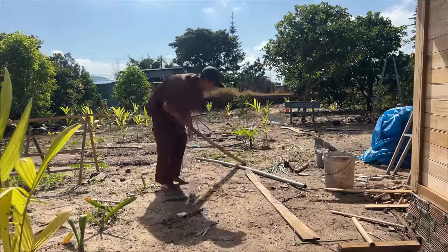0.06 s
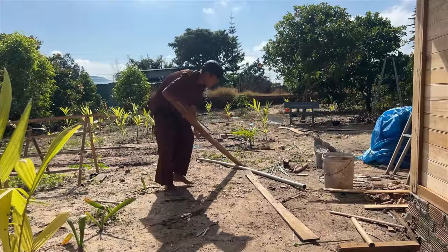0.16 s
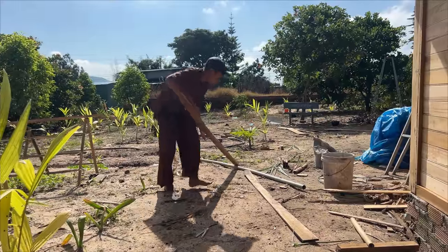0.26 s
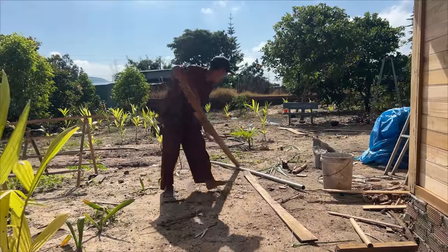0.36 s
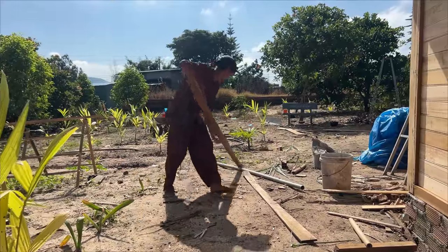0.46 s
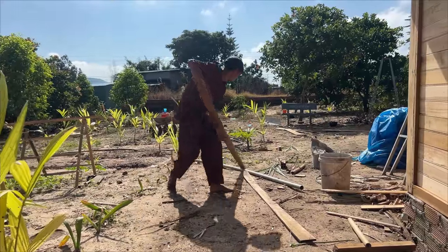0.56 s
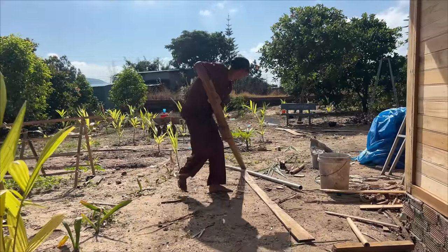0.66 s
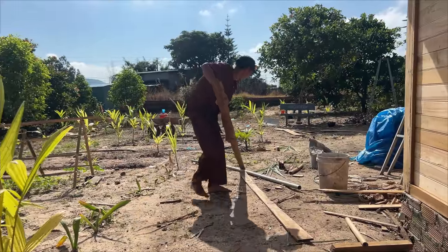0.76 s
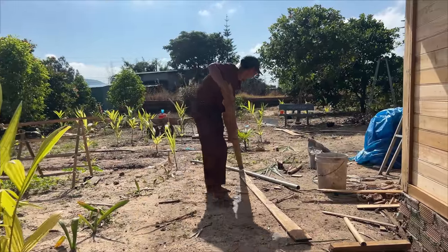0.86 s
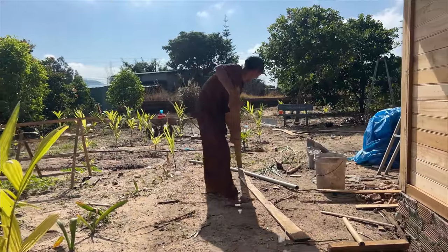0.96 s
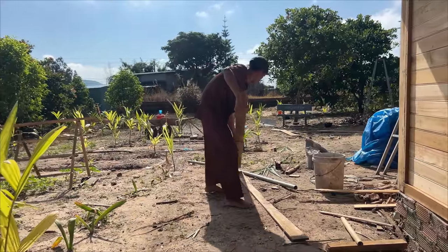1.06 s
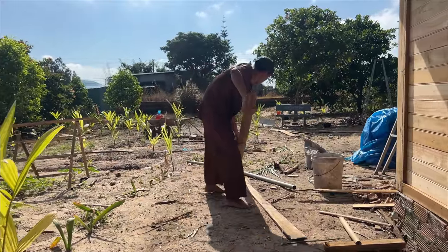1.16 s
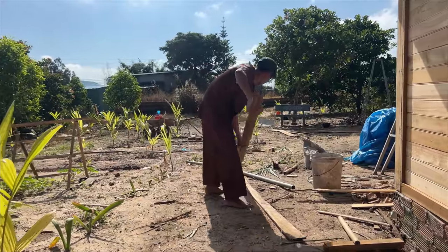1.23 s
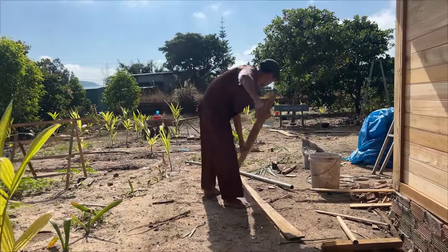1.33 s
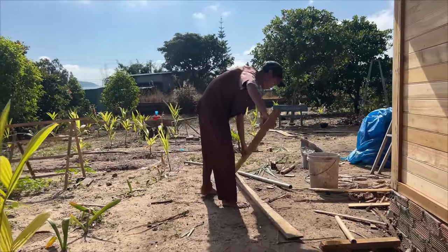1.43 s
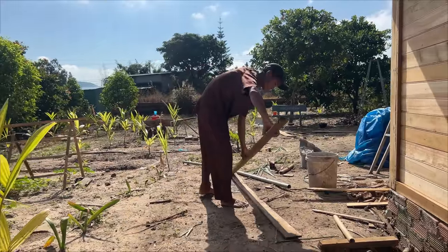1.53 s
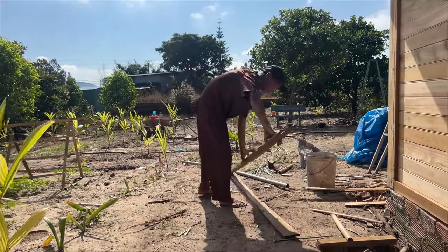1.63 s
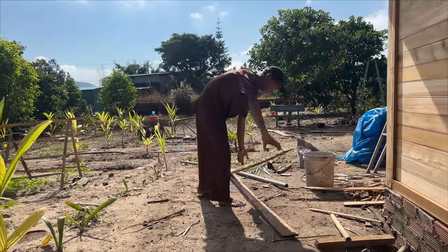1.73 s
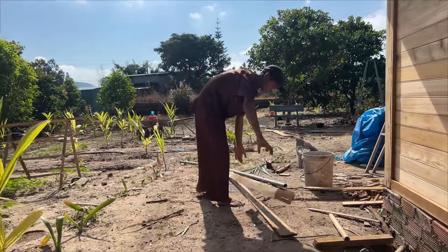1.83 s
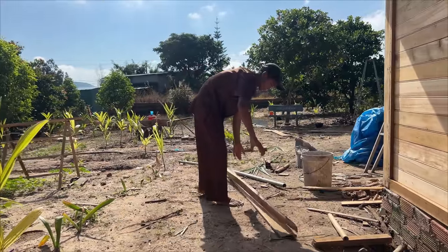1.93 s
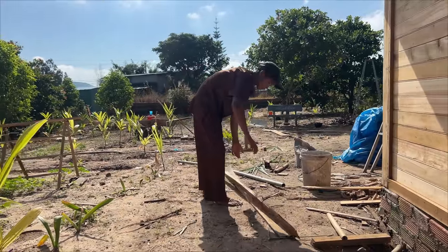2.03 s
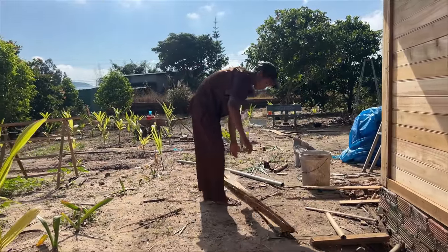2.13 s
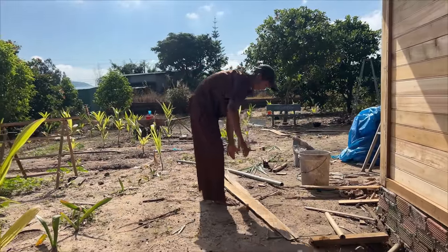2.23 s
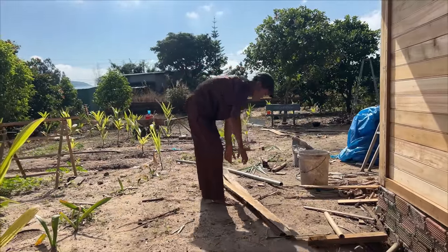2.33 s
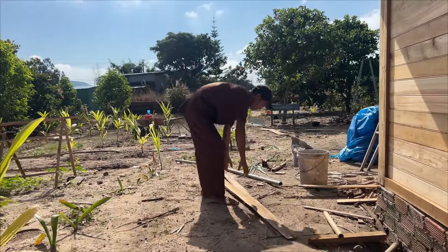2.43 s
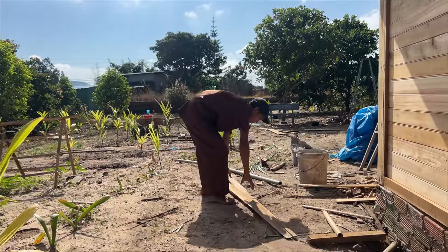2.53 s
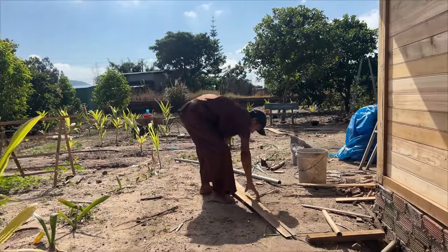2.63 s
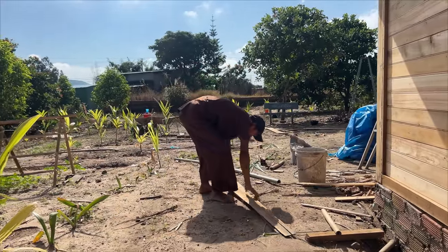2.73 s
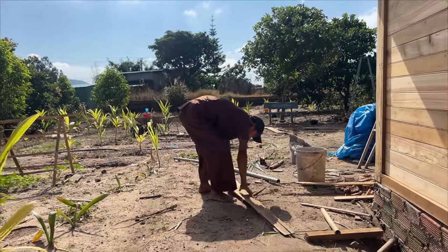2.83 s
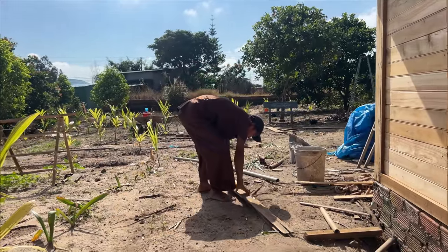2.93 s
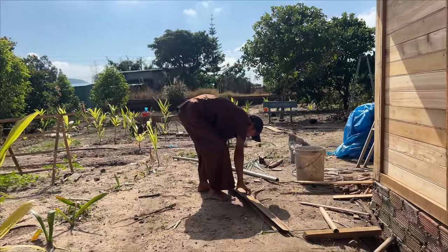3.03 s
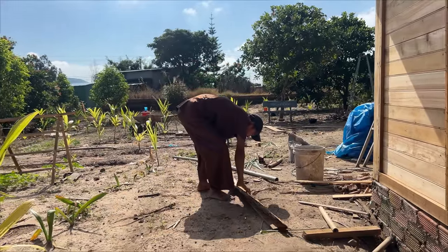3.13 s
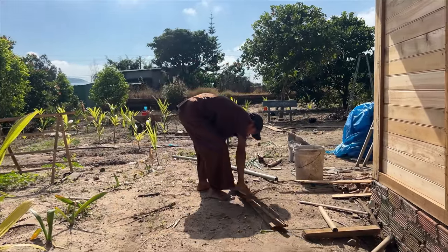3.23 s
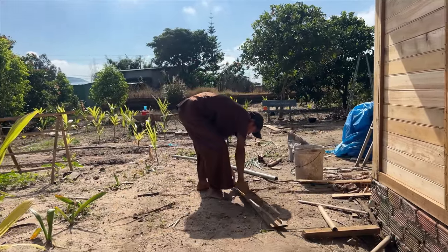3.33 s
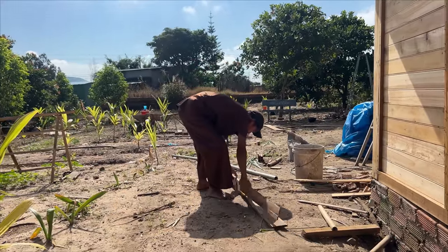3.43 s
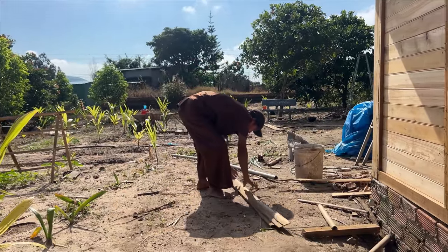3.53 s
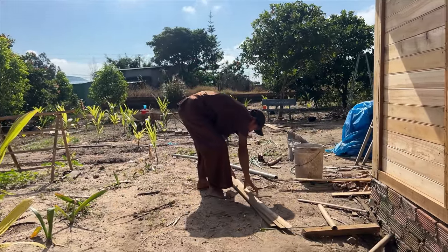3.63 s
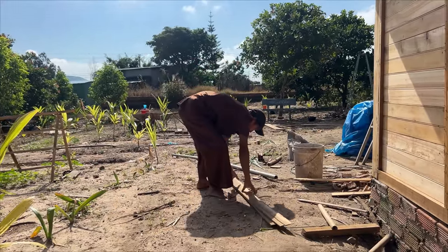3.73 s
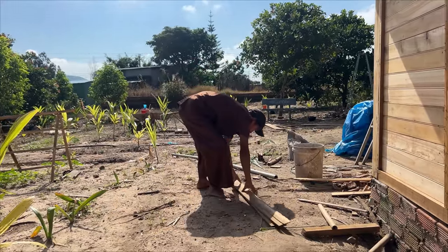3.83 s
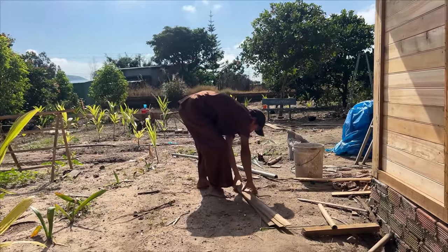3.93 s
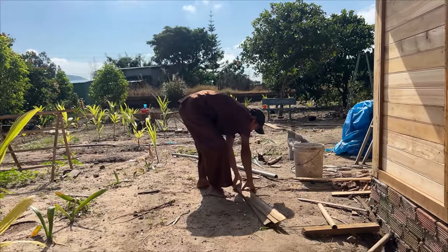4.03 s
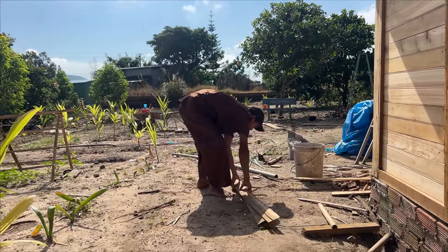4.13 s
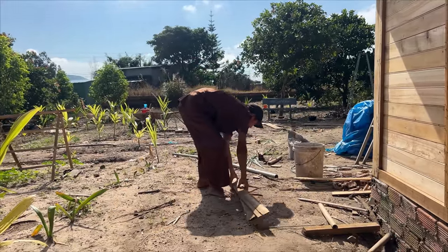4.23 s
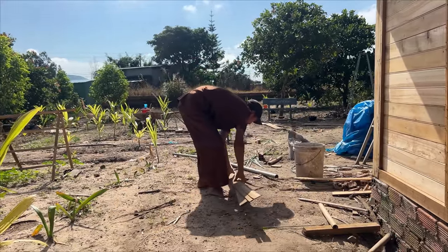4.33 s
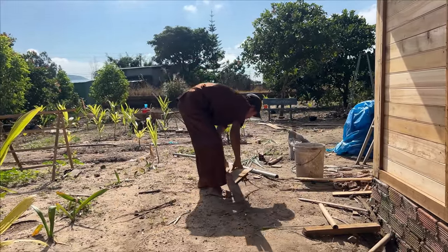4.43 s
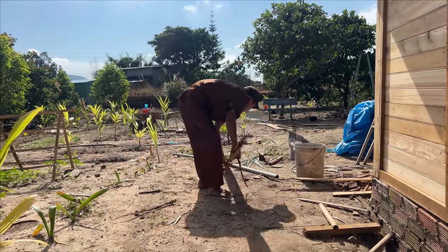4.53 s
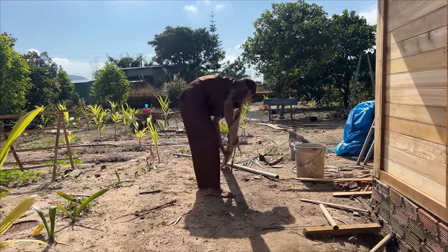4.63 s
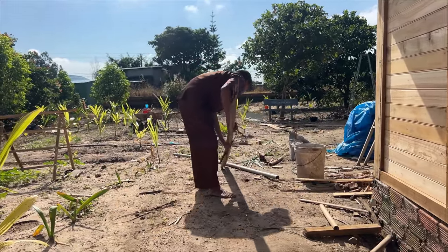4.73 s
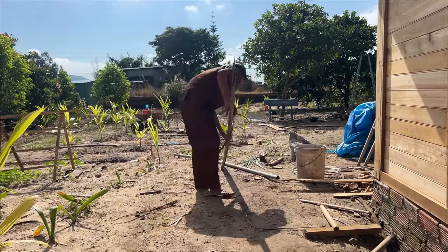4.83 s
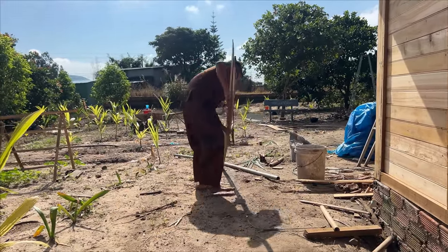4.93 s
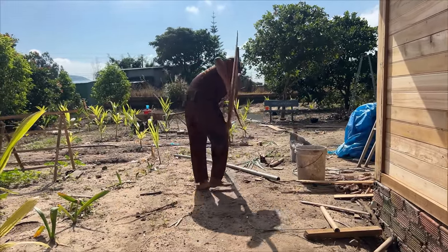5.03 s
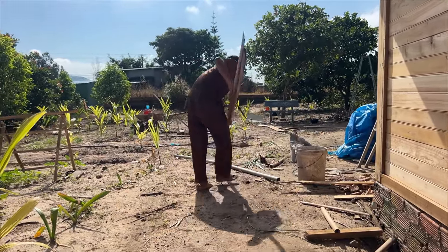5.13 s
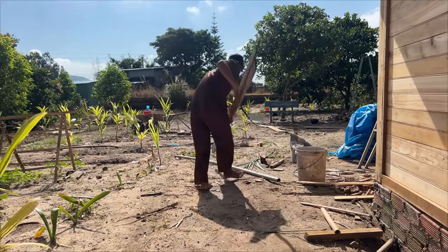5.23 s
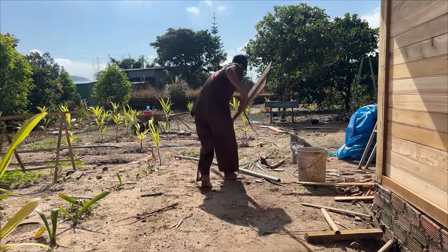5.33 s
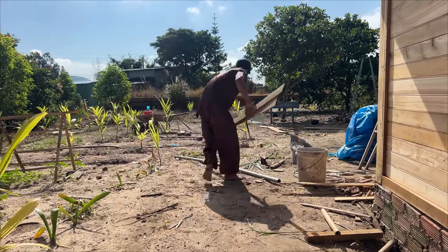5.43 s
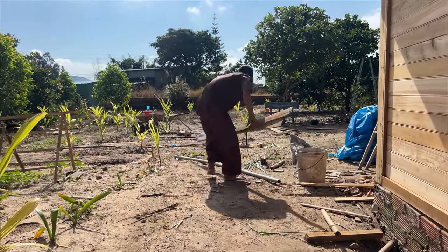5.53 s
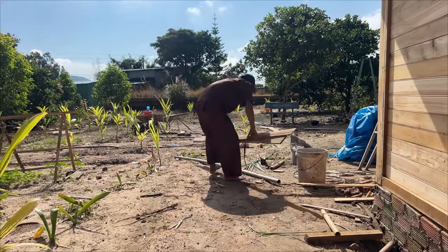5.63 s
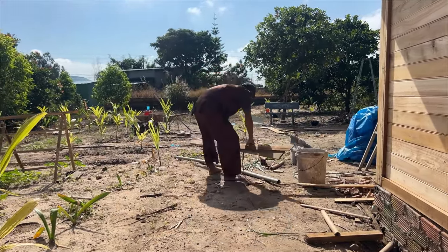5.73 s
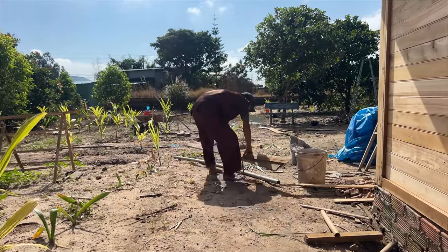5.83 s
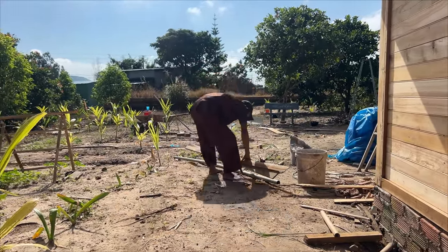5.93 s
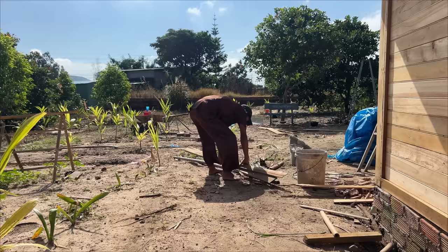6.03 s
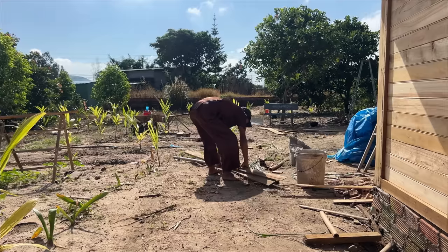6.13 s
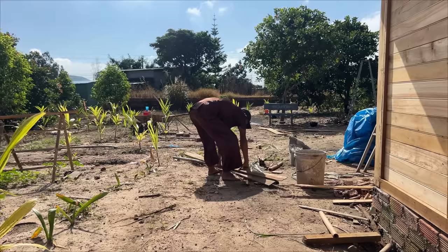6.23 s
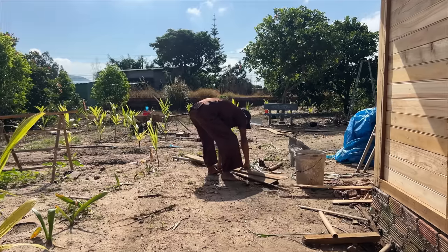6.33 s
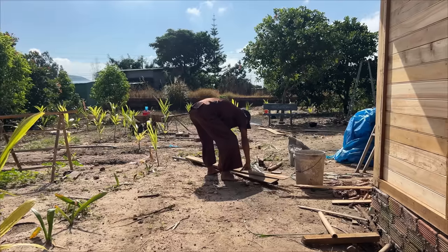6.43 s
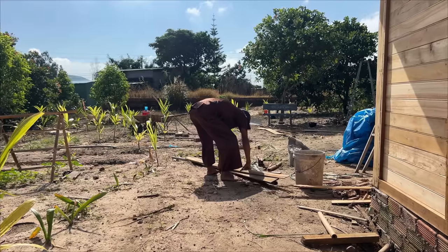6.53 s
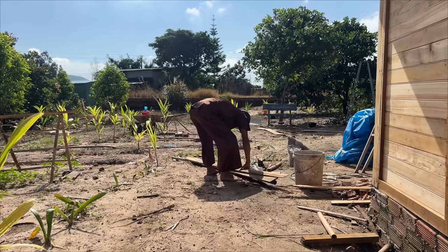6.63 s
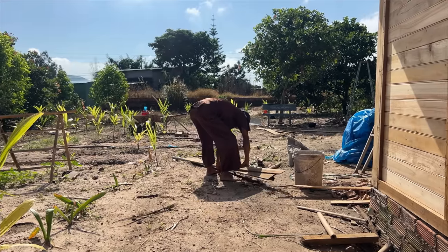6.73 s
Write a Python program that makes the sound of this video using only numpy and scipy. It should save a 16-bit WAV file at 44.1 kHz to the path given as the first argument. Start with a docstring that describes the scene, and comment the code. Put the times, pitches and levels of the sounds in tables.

```python
"""Boards and poles handled in a yard

Wooden boards and poles are dragged, dropped and gathered on dry soil, a few metres away.
Knocks ring board modes, crack and thud, with weak echoes and a short tail; wood and soles scuff grit as clumpy noise.
A pole sings as noise through resonances. Far engine orders, rumble and a hum lie behind, with still air and
faint chirps and narrow noise bands, made of randomly modulated sines."""
import sys
import numpy as np
from scipy import signal
from scipy.fft import rfft, irfft, next_fast_len
from scipy.io import wavfile
from scipy.ndimage import uniform_filter1d, map_coordinates

SR = 44100
rng = np.random.default_rng(int(sys.argv[2]) if len(sys.argv) > 2 else 0)


def file_out(sig):
    """Save sig as 16-bit WAV at sys.argv[1]."""
    # one column per channel
    cols = np.atleast_2d(sig).T
    # limit, then scale
    lim = np.clip(cols, -1, 1)
    pcm = np.round(lim * 32767).astype(np.int16)
    wavfile.write(sys.argv[1], SR, pcm)


N = 298137

# Far traffic and engine. Each row: time in seconds, rumble level in dB, engine level in dB.
FAR_LEVELS = [(0, -49.5, -54.5), (.5, -47, -51), (.8, -48, -61.5), (1.4, -51, -54), (2, -49.5, -67.5),
              (2.4, -45.5, -59.5), (2.9, -50, -61.5), (3.6, -49, -64), (4.5, -52.5, -90),
              (5.6, -50.5, -67.5), (6.5, -52.5, -63), (6.76, -42.5, -81)]
# Rumble spectrum. Each row: frequency in Hz, density in dB per Hz.
RUMBLE_SPECTRUM = [(20, -31), (39, -7), (59, 3.5), (130, -1), (165, -9.5), (220, -14.5), (300, -14),
                   (500, -49.5), (900, -71.5)]
# Engine orders. Each row: mean frequency in Hz, mean level in dB under the engine curve.
ENGINE_ORDERS = [(66, -6), (165, 1.5), (198, -1.1)]
HUM_HZ, HUM_DB = 250, -68
# Still yard, leaves and insects. Each row: frequency in Hz, density in dB per Hz.
AIR_SPECTRUM = [(180, -39), (300, -8), (432, -6), (1850, -13), (3100, -19), (6210, -14), (9400, -39),
                (15700, -49.5)]
AIR_RMS_DB = -68
# Faint chirps and narrow bands of noise, birds or insects.
# Each row: start in seconds, end in seconds, start, middle and end pitch in Hz, level in dB.
CHIRPS = [(.8, .95, 4700, 4750, 4700, -75), (1.05, 1.2, 5000, 5100, 5300, -76),
          (2.82, 3.3, 5150, 5050, 5200, -74), (4.98, 5.1, 4500, 4500, 4550, -76),
          (5.10, 5.15, 5500, 5150, 4900, -75), (5.165, 5.22, 5000, 5030, 5200, -72),
          (5.505, 5.54, 4750, 4650, 4600, -58), (6.285, 6.35, 5050, 5120, 5300, -69)]
# Pole resonances. Each row: frequency in Hz, width in Hz, relative level in dB.
POLE_RESONANCES = [(1180, 120, -4), (1350, 130, -1), (1520, 130, -1), (2010, 45, 3), (2550, 90, -10),
                   (3700, 400, -17)]
# Pull on the pole. Each row: time in seconds, level in dB.
POLE_PULL = [(0, -67.5), (.15, -59.5), (.22, -46), (.29, -56.5), (.4, -50), (.55, -45.5), (.6, -48.5),
             (.655, -48), (.7, -76), (1.1, -76)]
# Strokes over the soil. Each row: start in seconds, length in seconds, dragged wood in dB, loose grit in dB.
STROKES = [(0, 0.115, -57, -62), (0.18, 0.08, -56.5, -56), (0.284, 0.38, -54.5, -59),
           (0.68, 0.417, -60.5, -96), (1.277, 0.1, -49, -63.5), (1.57, 0.15, -66.5, -72),
           (1.93, 0.083, -33, -48), (2.071, 0.14, -34.5, -60), (2.266, 0.068, -31.5, -61.5),
           (2.413, 0.05, -42.5, -68.5), (2.767, 0.11, -55, -64), (3.182, 0.024, -58.5, -95),
           (3.5, 0.039, -54.5, -70.5), (3.552, 0.088, -46.5, -68), (3.675, 0.088, -54.5, -80),
           (3.935, 0.12, -54.5, -76.5), (4.276, 0.069, -54, -66.5), (4.592, 0.104, -66, -71.5),
           (4.743, 0.266, -57, -62.5), (5.291, 0.19, -68, -64), (5.383, 0.039, -58.5, -57.5),
           (5.53, 0.26, -63, -67.5), (5.748, 0.071, -55, -56.5), (5.851, 0.058, -55, -60),
           (5.992, 0.031, -52, -54.5), (6.062, 0.33, -64.5, -65.5), (6.67, 0.035, -56.5, -70.5),
           (6.714, 0.1, -47, -52.5)]
RISE_DB_PER_S, FALL_DB_PER_S = 595.5, 339  # into a stroke; after it, on top of the sag
DRAG_SAG_DB_PER_S = 17.5  # along a stroke
GRIT_SAG_DB_PER_S = 0.93 * DRAG_SAG_DB_PER_S
DRAG_REST_DB, GRIT_REST_DB = -72.5, -80  # between strokes
# Dragged wood spectrum. Each row: frequency in Hz, density in dB per Hz.
DRAG_SPECTRUM = [(250, -46), (400, 2.5), (900, -1.5), (1350, -0.5), (1750, -2), (2000, -3), (2400, -3.5),
                 (4000, -10.5), (6000, -46.5)]
# Loose grit spectrum. Each row: frequency in Hz, density in dB per Hz.
GRIT_SPECTRUM = [(1500, -33), (2800, -6), (4000, -2.5), (8300, -3), (9600, -7.5), (10500, -31.5),
                 (15700, -23)]
# Knocks and rebounds. Each row: start in seconds, ring peak in dB, ring centre in Hz,
# resonance width over that centre (ratio), crack in dB relative to the ring peak.
KNOCKS = [(0.171, -38, 1990, 0.95, 4.5), (0.21, -30, 2060, 2.1, -5), (0.232, -32, 2250, 0.58, -6),
          (0.257, -39.5, 1150, 0.72, -10), (0.312, -43, 2110, .5, 0), (0.643, -39, 2980, 0.42, -5),
          (1.018, -67.5, 3500, .5, 17.5), (1.2646, -22.5, 970, 1.5, -17.5), (1.272, -32.5, 1900, 2.6, -7),
          (1.2957, -30, 860, 1.35, -16), (1.924, -3, 1640, 1.9, -4.5), (1.931, -11, 1260, 2.1, -5),
          (1.946, -10.5, 1490, 3, -13), (1.96, -8.5, 2000, 1.7, -12), (2.066, -23, 1470, 1.3, -21.5),
          (2.074, -17.5, 1700, 0.5, -30), (2.121, -21.5, 1260, 0.94, -35.5), (2.129, -19, 1270, 1.8, -15.5),
          (2.159, -20, 980, 1.6, -16), (2.181, -16.5, 1610, 1.3, -21), (2.209, -27, 1690, 0.97, -18),
          (2.235, -19, 1730, 2.7, -11), (2.2626, -12, 2350, 0.75, -1), (2.272, -13.5, 1880, 1.3, -8.5),
          (2.302, -14, 1740, 0.69, -10), (2.32, -26, 1680, 0.45, -28), (2.343, -26.5, 1730, 0.77, -36),
          (2.371, -29, 1890, 1.4, -13), (2.386, -28, 2110, 1.3, -13.5), (2.398, -29, 1430, 0.68, -18),
          (2.432, -25, 1440, 1.6, -12.5), (2.444, -28.5, 1560, 3.3, -12), (2.535, -34, 1520, 0.73, -20),
          (2.752, -40.5, 1980, 0.34, -1.5), (3.533, -33, 486, 1.04, -13), (3.57, -12, 1690, 1.5, -46),
          (3.575, -20.5, 1300, 2.1, -16), (3.598, -21.5, 1490, 1, -13.5), (3.613, -22.5, 485, 0.83, -46),
          (3.627, -29, 1510, .4, -43.5), (3.635, -27, 635, 1.05, -38), (3.654, -27, 670, 0.5, -44),
          (3.675, -20.5, 2830, 1.3, -4.5), (3.682, -22, 1730, 2.7, -8.5), (3.938, -39, 2410, 0.57, -8.5),
          (3.945, -36, 1400, 0.48, -24), (4.033, -39, 1520, 1.1, -5), (4.045, -30.5, 2270, 0.29, -8.5),
          (4.214, -40, 1660, 0.94, -38), (4.266, -35.5, 1760, 1.5, -10), (4.298, -41, 1260, 0.52, -21),
          (4.764, -49.5, 735, 0.24, -2), (4.879, -39.5, 2130, 0.68, 0.5), (5.404, -52, 980, 0.43, -2),
          (5.51, -51.5, 1277, 0.63, 8), (5.772, -49, 1600, 1.6, -5), (5.975, -54, 1220, 0.41, -7),
          (6.004, -42.5, 590, 0.4, -12), (6.056, -47.5, 1195, 0.61, -11), (6.148, -53.5, 1680, 0.68, -22),
          (6.539, -48.5, 1090, 1.2, -27), (6.619, -53.5, 903, .5, -20), (6.66, -45.5, 760, 0.82, -17.5),
          (6.696, -42.5, 1100, 0.51, -18.5), (6.722, -36, 520, 1.5, -15.5), (6.753, -34.5, 1700, 0.89, 2.5)]
# Board modes. Each row: mean frequency in Hz, mean level in dB, t60 in seconds.
BOARD_MODES = [(510, -10, .035), (670, -4, .04), (790, -4, .04), (1020, -5, .03), (1195, -4, .045),
               (1330, -4, .035), (1481, -6, .035), (1600, -2, .045), (1880, -1, .04), (2170, -2, .028),
               (2416, -7, .02), (2595, -7.5, .025), (2910, -6, .022)]
# Crack spectrum. Each row: frequency in Hz, density in dB per Hz.
CRACK_SPECTRUM = [(1500, -31.5), (2500, -1.5), (4000, -1.5), (6000, -9.5), (9500, -19), (11000, -37.5),
                  (15700, -37)]
BEND_LAG_S = 0.00203  # bending waves: delay at f Hz is this times 1000 / (200 + f) - 1/4
THUD_DB, THUD_DB_PER_DB = -22, 0.83  # thud gain at a 0 dB knock; growth per dB of knock
# Ground and wall echoes. Each row: mean delay in seconds, mean level in dB.
ECHOES = [(.008, -11), (.014, -12), (.021, -14)]
# Yard tail decay. Each row: frequency in Hz, t60 in seconds.
YARD_T60 = [(200, .3), (1500, .2), (8000, .17)]
# Stereo likeness of the noises. Each row: frequency in Hz, left-right correlation (ratio).
LIKENESS = [(60, 1), (150, 0.92), (300, 0.863), (700, 0.069), (3000, 0.023)]
# The body shades the left port. Each row: frequency in Hz, left over right in dB.
LEFT_OVER_RIGHT = [(130, 1), (640, -1), (3100, -1.5), (6800, -10.5), (10000, 1.5)]
TOP_HZ = 15800


def amp(db):
    """Gain of a level in dB."""
    return 10 ** (np.asarray(db) / 20)


def unit(x):
    """x at rms 1."""
    return x / np.sqrt(np.mean(x ** 2) + 1e-20)


def along(points, hz):
    """Interpolate (Hz, value) points on a log frequency axis."""
    f, value = np.transpose(points)
    return np.interp(np.log(hz + 1), np.log(f + 1), value)


def curves(rows):
    """One value per sample for each column after the time."""
    time_s, *columns = np.transpose(rows)
    return [np.interp(np.arange(N) / SR, time_s, column) for column in columns]


def wobble(rate_hz):
    """A smooth random curve with rate_hz knots a second."""
    knots = rng.standard_normal(int(N * rate_hz / SR) + 4)
    return map_coordinates(knots, [np.arange(N) * rate_hz / SR])


def filtered(x, response):
    """x times a complex response of frequency in Hz."""
    size = next_fast_len(x.shape[-1] + 4096)
    spectrum = rfft(x, size) * response(np.fft.rfftfreq(size, 1 / SR))
    return irfft(spectrum, size)[..., :x.shape[-1]]


def resonance(f, hz, width_hz):
    """A causal resonance of peak gain 1."""
    return 1j * f * width_hz / (hz * hz - f * f + 1j * f * width_hz + 1e-9)


def rush(pair, spectrum, patchy_db=0):
    """Two unrelated noises, patchy in time and frequency, coloured and mixed to a stereo pair of rms 1."""
    z = signal.stft(pair, nperseg=512)[2]
    field = uniform_filter1d(rng.standard_normal(z.shape[1:]), 10, 0)
    field = uniform_filter1d(field, 10, 1)
    pair = signal.istft(z * amp(patchy_db * unit(field)), nperseg=512)[1][:, :N]

    def mid_side(hz):
        turn = np.arccos(np.clip(along(LIKENESS, hz), -1, 1)) / 2  # sets the correlation
        return amp(along(spectrum, hz)) * [np.cos(turn), np.sin(turn)]

    mid, side = filtered(pair, mid_side)
    return unit(np.array([mid + side, mid - side]))


def distance():
    """Low rumble as noise, wavering orders of a far engine as sines, and a thin hum."""
    rumble_db, engine_db = curves(FAR_LEVELS)
    t = np.arange(N) / SR
    turned_s = np.cumsum(1 + 0.025 * wobble(3.2)) / SR  # time at the wavering engine speed
    engine = 0
    for hz, db in ENGINE_ORDERS:
        engine = engine + amp(db + 4 * wobble(4.5)) * np.sin(2 * np.pi * (hz * turned_s + rng.random()))
    hum = amp(HUM_DB + 0.63 * wobble(16.0)) * np.sin(2 * np.pi * HUM_HZ * t)
    noise = rush(rng.standard_normal((2, N)), RUMBLE_SPECTRUM)
    rumble = amp(rumble_db + 2.6 * wobble(7.6)) * noise
    return rumble + amp(engine_db) * engine + hum


def still_air():
    """Leaves and insects as steady, patchy noise."""
    return amp(AIR_RMS_DB) * rush(rng.standard_normal((2, N)), AIR_SPECTRUM, patchy_db=2.5)


def chirps():
    """Faint high chirps and narrow noise bands: gliding or nearly steady sines, randomly modulated."""
    out = np.zeros(N)
    roughness = np.array([wobble(250), wobble(250)]) * amp(2.5 * wobble(40))  # widens the sines
    for start_s, end_s, start_hz, middle_hz, end_hz, db in CHIRPS:
        u = np.linspace(0, 1, round((end_s - start_s) * SR))
        pitch_hz = np.interp(u, [0, .5, 1], [start_hz, middle_hz, end_hz])
        sine = np.sin(2 * np.pi * np.cumsum(pitch_hz) / SR)
        swell = np.sqrt(2 * np.sin(np.pi * u).clip(0))
        out[round(start_s * SR):][:len(u)] += amp(db) * swell * sine
    return out * roughness


def pole():
    """A thin pole pulled over the soil sings roughly; each resonance comes and goes as the grip shifts."""
    rub = rng.standard_normal((2, N)) * amp(3 * wobble(120) + 1.2 * wobble(30))
    ring = np.zeros((2, N))
    for hz, width_hz, db in POLE_RESONANCES:
        ring += amp(db + 2 * wobble(14)) * filtered(rub, lambda f: resonance(f, hz, width_hz))
    pull_db = curves(POLE_PULL)[0]
    return amp(pull_db) * unit(ring + 0.2 * ring[::-1])  # some of each side in the other


def strokes(column, sag_db_per_s, rest_db):
    """Gain of one layer: every stroke rises fast, sags while it lasts and falls away."""
    t = np.arange(0, N, 32) / SR
    power = amp(2 * rest_db)
    for row in STROKES:
        u = t - row[0]
        rise_and_sag_db = np.minimum(RISE_DB_PER_S * u, -sag_db_per_s * u)
        fall_db = FALL_DB_PER_S * np.clip(u - row[1], 0, None)
        power = power + amp(2 * (row[column] + rise_and_sag_db - fall_db))
    return np.interp(np.arange(N) / SR, t, np.sqrt(power))


def grains(rough_db, rate_hz):
    """Noise in clumps of grains, shaped by a random level."""
    return rng.standard_normal((2, N)) * amp(rough_db * wobble(rate_hz))


def scuff():
    """Wood and soles rub dry soil: clumpy noise, the wood part coloured by the board modes."""
    drag = amp(2.5 * wobble(25)) * rush(grains(2.5, 150), DRAG_SPECTRUM, patchy_db=1.7)

    def board_sings(f):
        return 2.2 + sum(np.abs(resonance(f, hz, 60)) ** 2 for hz, *_ in BOARD_MODES)

    drag = unit(filtered(drag, board_sings))
    grit = amp(2.2 * wobble(20)) * rush(grains(3, 300), GRIT_SPECTRUM, patchy_db=1.7)
    drag = drag * strokes(2, DRAG_SAG_DB_PER_S, DRAG_REST_DB)
    grit = grit * strokes(3, GRIT_SAG_DB_PER_S, GRIT_REST_DB)
    return drag + grit


def yard(blow, wet_db):
    """One knock at both ports: direct sound, a few echoes and a short scattered tail."""
    n = len(blow)
    hz, t, z = signal.stft(rng.standard_normal((2, n)), SR, nperseg=256)
    decay = amp(-60 * t / along(YARD_T60, hz)[:, None])
    tail = signal.istft(z * decay, SR, nperseg=256)[1][:, :n]
    onset = np.clip(np.arange(n) / SR / 0.0009, 0, 1)
    path = amp(wet_db) * tail / np.linalg.norm(tail[0]) * onset
    walls = np.zeros((2, n))
    for delay_s, db in ECHOES:
        arrival = round(delay_s * SR) + rng.integers(-16, 17, size=2)
        walls[[0, 1], arrival] += amp(db + rng.normal(0, 1.5, size=2))
    path += filtered(walls, lambda f: 1 / (1 + 1j * f / 4000))  # walls return little treble
    path[:, 0] += 1  # direct sound
    return signal.fftconvolve(blow[None], path, axes=1)[:, :n]


def board_ring(t, centre_hz, spread):
    """Decaying sine modes struck by a chattering contact, loudest around a centre, at peak 1."""
    short = t[:SR // 12]  # the modes are dead by then
    hz, level_db, t60_s = np.transpose(BOARD_MODES)[:, :, None]
    gain = amp(level_db + rng.normal(0, 2.5, hz.shape))
    bent_hz = hz * (1 + rng.normal(0, 0.015, hz.shape))  # boards differ a little
    modes = np.sum(gain * amp(-60 * short / t60_s) * np.sin(2 * np.pi * bent_hz * short), axis=0)
    touches = rng.standard_normal(len(t)) * (rng.random(len(t)) < .03)
    chatter = amp(-11 - 60 * t / .02) * touches
    chatter[0] = 1  # the first contact, then smaller ones along the board
    ring = signal.fftconvolve(modes, chatter)[:len(t)]
    ring = filtered(ring, lambda f: resonance(f, centre_hz, spread * centre_hz) ** 2)
    ring *= (1 - np.exp(-t / 0.001)) ** 2  # the soft face of the wood rounds the attack

    def bending(f):
        return np.exp(-2j * np.pi * BEND_LAG_S * (1000 * np.log(1 + f / 200) - f / 4))

    ring = filtered(ring, bending)
    return ring / np.abs(ring).max()


def wood_crack(t):
    """A short burst of coloured noise, at rms 1 before its envelope."""
    crack = unit(filtered(rng.standard_normal(len(t)), lambda f: amp(along(CRACK_SPECTRUM, f))))
    return crack * (1 - np.exp(-t / 0.0038)) * amp(-60 * t / 0.041)


def soil_thud(t):
    """Thud on the soil: three low sines under one quick rise and decay."""
    push = amp(-60 * t / 0.092) * (1 - np.exp(-t / 0.0037))
    low = np.sin(2 * np.pi * 105 * t) + 0.85 * np.sin(2 * np.pi * 250 * t)
    return push * (low + 0.9 * np.sin(2 * np.pi * rng.uniform(320, 480) * t))


def knocks():
    """Each blow rings the board modes, loudest around its centre frequency, cracks, and thuds on the soil."""
    out = np.zeros((2, N + SR))
    t = np.arange(SR // 4) / SR
    for start_s, db, centre_hz, spread, crack_db in KNOCKS:
        wood = board_ring(t, centre_hz, spread) + amp(crack_db) * wood_crack(t)
        thud = amp(THUD_DB + THUD_DB_PER_DB * db) * soil_thud(t)
        blow = amp(db) * yard(wood, wet_db=-5.0) + thud
        out[:, round(start_s * SR):][:, :len(t)] += blow
    return out[:, :N]


def scene():
    """All sources at the two ports."""
    return distance() + still_air() + chirps() + pole() + scuff() + knocks()


def record(dry):
    """Peaks saturate; the left port lags and is shaded; the microphone drops deep bass and the top."""
    def lag(hz):
        delay_s = 6.5e-5 / (1 + (hz / 8000) ** 2)
        return np.exp(-2j * np.pi * hz * delay_s * np.array([[1], [0]]))

    def shade(hz):
        return amp(along(LEFT_OVER_RIGHT, hz) * np.array([[.5], [-.5]]))

    def low_cut(hz):
        return 1j * hz / (40 + 1j * hz)

    soft = dry / (1 + np.abs(dry / .95) ** 4) ** (1 / 4)
    return filtered(soft, lambda hz: lag(hz) * shade(hz) * low_cut(hz) * (hz < TOP_HZ))


dry = scene()
out = record(dry)
file_out(out)
```